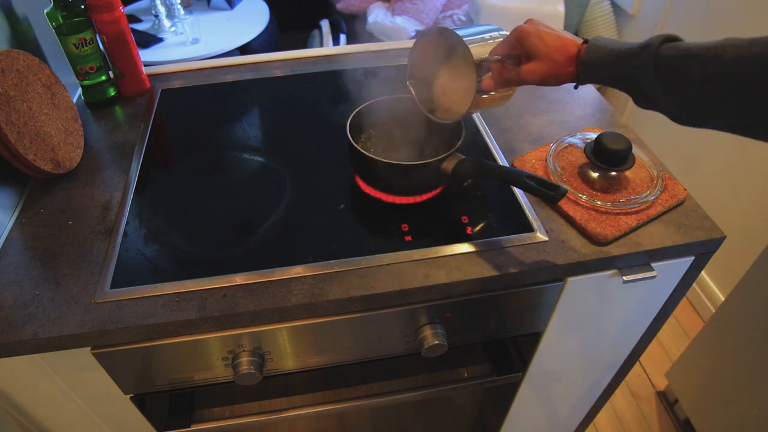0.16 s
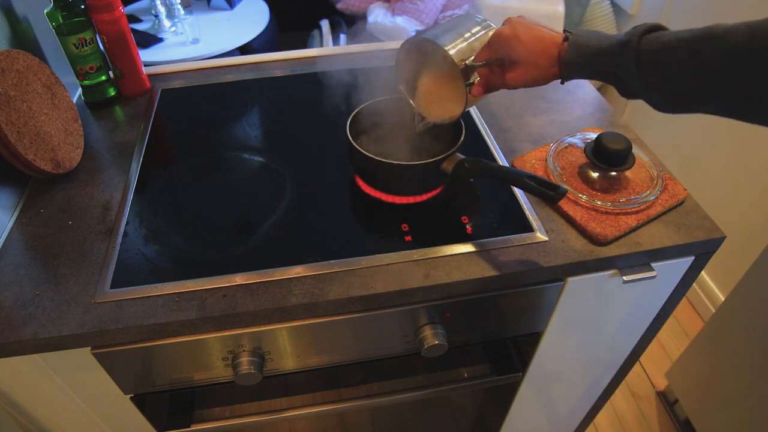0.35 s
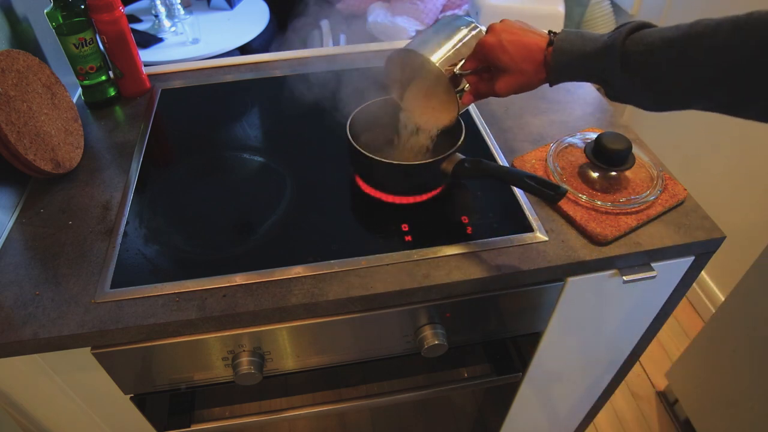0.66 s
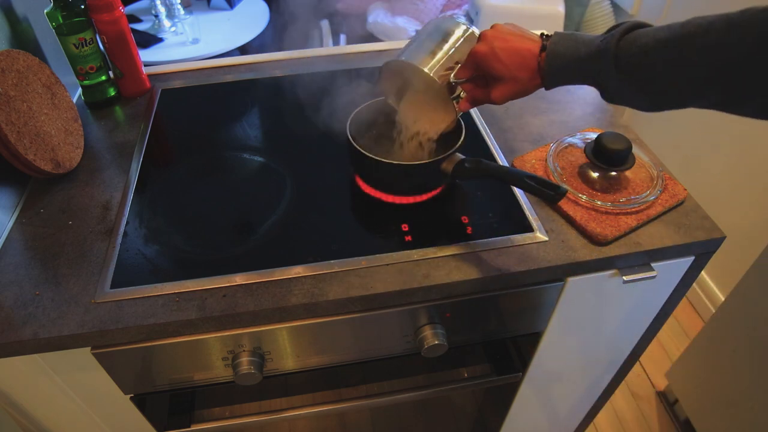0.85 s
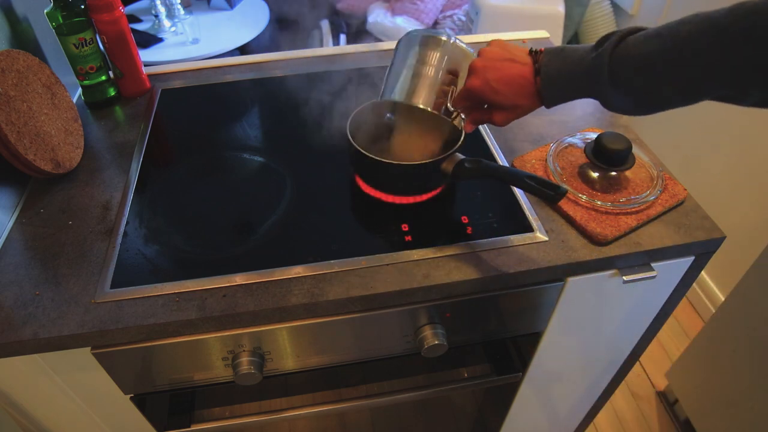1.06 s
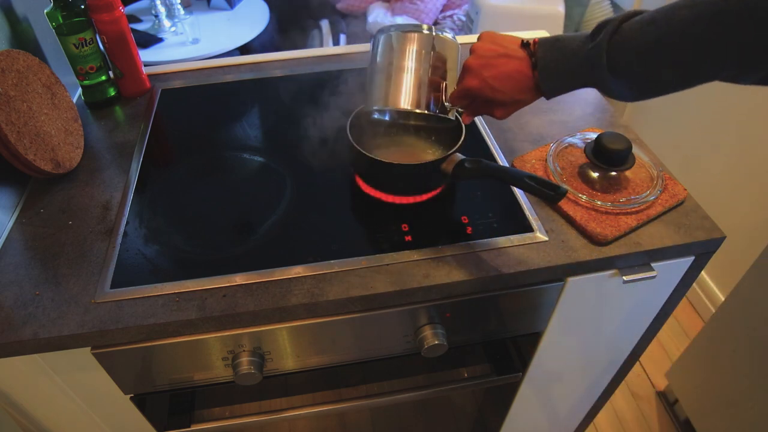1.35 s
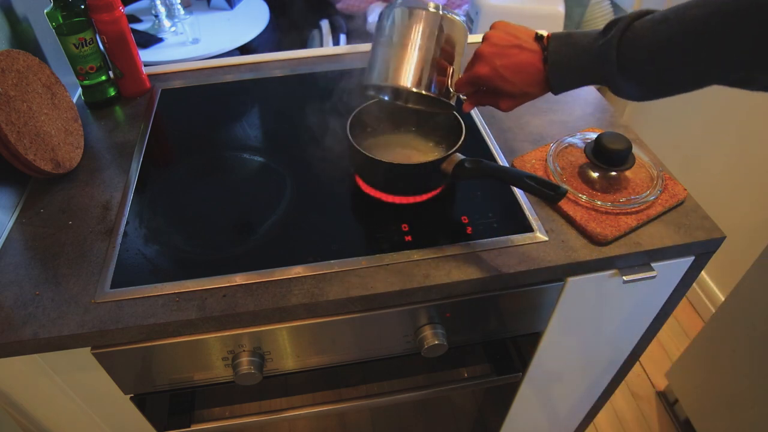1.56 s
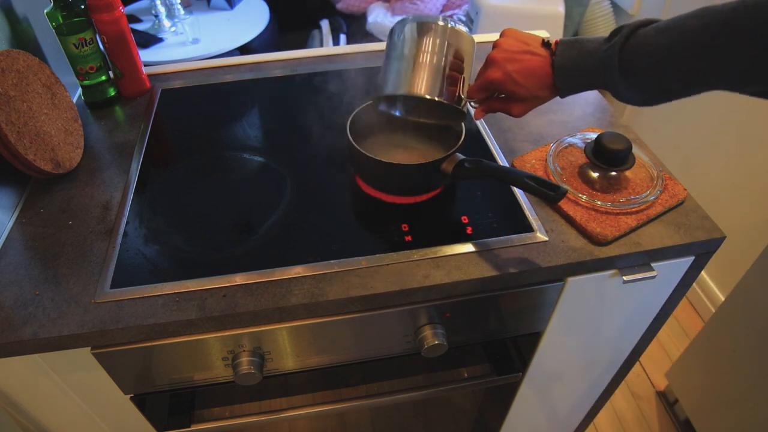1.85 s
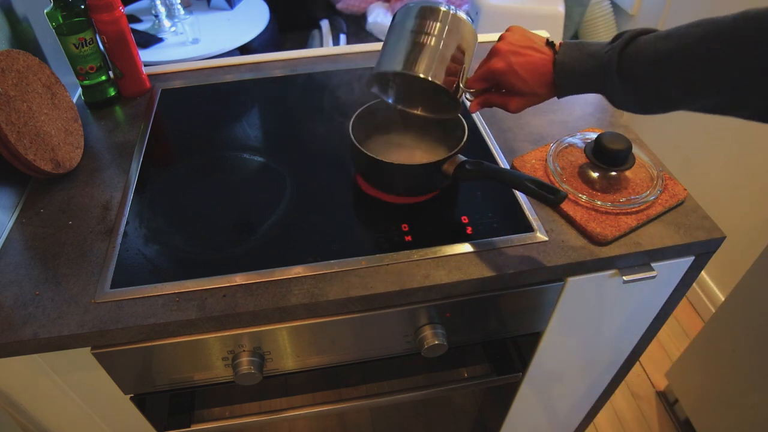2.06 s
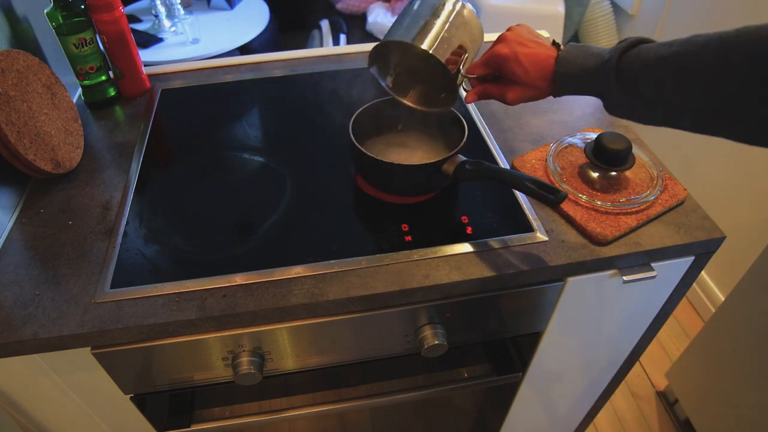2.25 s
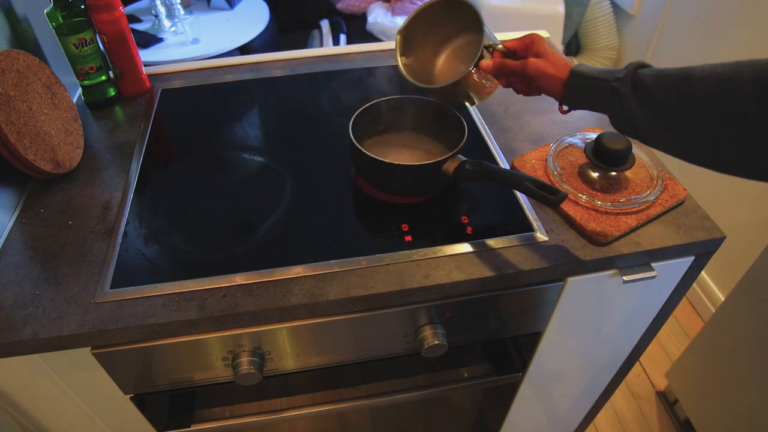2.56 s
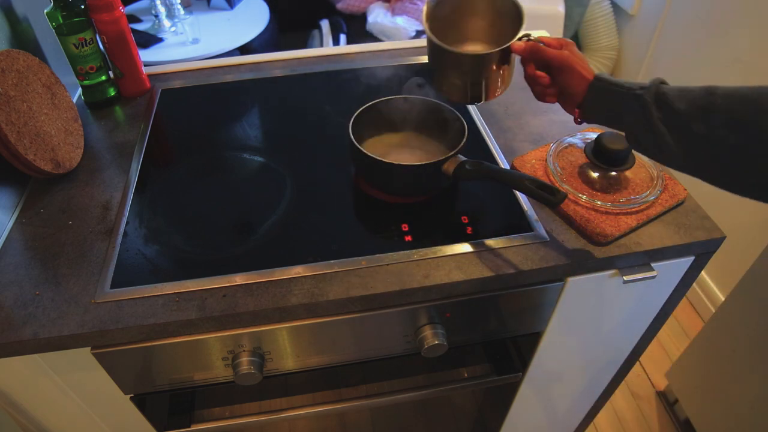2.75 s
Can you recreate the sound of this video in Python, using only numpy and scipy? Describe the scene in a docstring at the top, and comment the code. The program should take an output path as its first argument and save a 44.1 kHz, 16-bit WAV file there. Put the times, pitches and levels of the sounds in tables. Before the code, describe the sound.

Rice grains slide off steel and patter into a bubbling pot, followed by two metallic knocks

```python
"""A small kitchen: dry rice slides out of a steel jug into a pot of simmering water.
Dense random impacts, coloured separately for steel and water, make the hiss and patter; shakes add surges.
The same kind of impacts drive resonant modes for the singing jug and the bubbles.
Dull knocks fall during the pour and hard metal knocks follow, built from decaying sines and noise bands."""
import sys
import numpy as np
from scipy import signal
from scipy.fft import rfft, irfft
from scipy.io import wavfile
from scipy.ndimage import uniform_filter1d

SR = 44100
rng = np.random.default_rng(int(sys.argv[2]) if len(sys.argv) > 2 else 0)


def to_wav(sig):
    """Store sig (one row per channel, or 1-D mono) as 16-bit WAV at the path in sys.argv[1].

    Samples outside -1..1 are clipped; the rate is SR.
    """
    pcm = np.clip(np.atleast_2d(sig), -1, 1) * 32767
    pcm = np.round(pcm).astype(np.int16)
    wavfile.write(sys.argv[1], SR, pcm.T)  # frames by channels


N = 127890
TIME = np.arange(N) / SR  # scene clock [s]
AGE = np.arange(2 ** 15) / SR  # time since a knock or skitter began [s]

# quiet kitchen background: (frequency [Hz], relative density [dB per Hz])
FLOOR_COLOUR = [(25, -11), (55, -5.5), (80, 3), (130, -3), (220, 0), (400, -12), (1200, -12.5),
                (3000, -22.5), (8000, -31.5), (16000, -29)]
FLOOR_DB = -62.5

# the boil, quenched by the cold rice: (time [s], level [dB])
BOIL_LEVEL = [(0, -55.5), (.4, -57.5), (.7, -54), (1.0, -60), (1.3, -61.5), (1.5, -68.5), (2.0, -72.5),
              (2.9, -67)]
# tone shaping of the bubbles: (frequency [Hz], gain [dB])
BOIL_COLOUR = [(100, -23), (250, -5.5), (500, 7), (720, 0), (1050, 2.5), (1600, -2.5), (2500, -24),
               (6000, -46)]
BUBBLES_PER_S, BUBBLE_SPREAD_DB = 2600, 1.5

# knocks: (time [s], level [dB], contact cut-off [Hz], bass [dB], dense ring [dB], steel ring [dB],
#          share struck on the rim [0-1], extra damping from contact [dB per s])
KNOCKS = [(0.186, -12, 536, -5, 8, -40, 0, 125), (0.433, -18.5, 880, -28, 0, -32, .5, 400),
          (0.4996, -11.5, 750, 1, 1.5, -11, .5, 86), (1.1629, -5.5, 1300, -10, -2, -28, .5, 215),
          (1.6966, -34, 1080, -12, 13, 5.5, 0.6, 44), (2.0405, 2.5, 3340, -4, -2.5, -1.5, 0.37, 15),
          (2.5162, 4, 670, -2, -2, -3.5, 0.9, 8), (2.529, -9, 1980, -12.5, 1, -21, .9, 252)]
# dull body modes of the pot on the hob: (frequency [Hz], level [dB], undamped t60 [s])
POT_MODES = [(148, -20.5, 0.051), (185, -27, 0.31), (228.6, -36, 0.28), (286.5, -37.5, 0.34),
             (364, -32.5, 0.2), (433.3, -24, 0.091), (488.7, -31, 0.23), (675, -20, 0.018),
             (748, -34, 0.18), (1178, -30.5, 0.15), (1230, -20, 0.012), (1397, -33, 0.12),
             (1650, -33, 0.072), (1750, -29, 0.099), (1837, -28.5, 0.05), (1932, -26, 0.11),
             (2260, -20.5, 0.017)]
BASS_HZ = 280  # a knock's bass setting acts below about here
# steel modes: (frequency [Hz], struck on the wall [dB], struck on the rim [dB],
#               stirred by grains [dB], undamped t60 [s])
STEEL_MODES = [(2840, -60, -53, -18, .3), (3058, -58, -45, -13, .62), (3467, -62, -48, -24, .35),
               (3541, -45, -49, -9, .33), (3704, -58, -37, -22, .33), (3845, -33, -51, -18, .41),
               (3868, -40, -58, -22, .36), (4480, -33, -52, -16, .07), (4720, -58, -60, -7, .5),
               (4830, -54, -38, -4, .3), (5130, -48, -55, -16, .22), (5367, -60, -57, -8, .24),
               (5706, -64, -60, -11, .24), (6470, -45, -56, -18, .33), (6584, -47, -56, -9, .3),
               (7080, -42, -52, -15, .27), (7420, -56, -40, -20, .14), (7960, -42, -56, -21, .19),
               (8608, -55, -52, -16, .2), (9900, -54, -54, -24, .25)]
# dense modes of the dull body, spread by the room: (frequency [Hz], relative density [dB per Hz])
THUD_COLOUR = [(30, -28), (70, -1), (160, 8.5), (280, -2.5), (430, -1.5), (720, -5), (950, -6),
               (1400, -0.5), (2000, -4), (2700, -26), (6000, -73)]
# dense modes of the steel, spread by the room: (frequency [Hz], relative density [dB per Hz])
CLANK_COLOUR = [(600, 12), (1600, 5.5), (2700, -1.5), (4500, -1.5), (6000, -5.5), (7500, -3.5),
                (10000, -7.5), (16000, -14)]
THUD_DB, CLANK_DB = -26.5, -33.5  # dense rings, before each knock's own levels
# how long the dense modes last: (frequency [Hz], undamped t60 [s])
DENSE_DECAY = [(60, 0.49), (170, 0.52), (450, 0.43), (1500, 0.4), (4000, 0.44), (14000, 0.25)]
CRACK_DB, CRACK_S = -24, .0045  # noise at first contact: level in the clank, time constant [s]
# the worktop booms on after a knock: (frequency [Hz], level [dB], t60 [s])
WORKTOP_BOOM = (60, -45.5, 0.6)
BOOM_FOLLOWS = 0.36  # share of a knock's level plus bass, in dB, that the boom follows

# loose grains skittering round the jug: (time [s], level [dB], favoured mode region [Hz])
SKITTERS = [(1.332, -44, 3541), (1.36, -59, 2840), (1.36, -63, 5706), (1.535, -63, 3541),
            (1.838, -49, 4810), (1.9, -56, 3541), (2.675, -58, 6470), (2.7, -64, 3845)]
SKITTER_RISE_S, SKITTER_WIDTH_HZ = .02, 50

# how strongly sliding grains set the jug ringing: (time [s], level [dB])
SINGING_LEVEL = [(0, -66), (.6, -82), (1.15, -63.5), (1.3, -63), (1.38, -56.5), (1.45, -64.5), (1.52, -74),
                 (1.57, -78), (1.65, -94), (1.8, -62.5), (1.83, -73), (1.85, -55), (1.96, -59), (2.1, -78),
                 (2.27, -71), (2.36, -98.5), (2.9, -91)]

# rice sliding along the jug wall: (time [s], level [dB])
SLIDE_LEVEL = [(0, -44.5), (.07, -60.5), (.11, -54), (.2, -53), (.3, -53.5), (.42, -60.5), (.56, -64),
               (.9, -67), (1.1, -59), (1.25, -55.5), (1.38, -53), (1.46, -66), (1.55, -70.5), (1.62, -78.5),
               (2.3, -79), (2.9, -111)]
# rice landing in the water: (time [s], level [dB])
STREAM_LEVEL = [(0, -59), (.25, -59.5), (.5, -62.5), (.62, -56.5), (.73, -52), (.9, -55.5), (1.1, -52),
                (1.26, -52.5), (1.36, -60), (1.45, -67), (1.6, -98), (2.9, -98)]
# shakes that throw loose grains against the steel: (time [s], level [dB], decay time constant [s])
SHAKES = [(-.003, -38.5, 0.0057), (.096, -50, 0.013), (0.185, -45, 0.0072), (.366, -57, .004),
          (1.495, -61, 0.014), (1.55, -65, 0.0097), (1.649, -65, .004), (1.713, -59, 0.012),
          (1.731, -58, 0.089), (1.784, -50, 0.013), (1.835, -45, 0.021), (1.863, -53.5, 0.087),
          (1.899, -49, 0.028), (1.961, -56, 0.025), (2.255, -64, 0.021), (2.672, -61, 0.038)]
SHAKE_ATTACK_S = .004
# tone of grains on steel: (frequency [Hz], relative density [dB per Hz])
STEEL_HISS = [(1000, -6.5), (2500, -10.5), (4500, -2), (7000, 1.5), (9500, 0.5), (12500, 5), (14500, 3),
              (16000, -9)]
# tone of grains on water: (frequency [Hz], relative density [dB per Hz])
WATER_HISS = [(150, 8), (500, 7), (1000, 4.5), (1800, 4.5), (3200, 6), (5500, 1.5), (8000, -1.5),
              (15000, -15)]
STEEL_GRAINS_PER_S, WATER_GRAINS_PER_S, GRAIN_SPREAD_DB = 14000, 6000, 2.5
TICKS_PER_S, TICK_SPREAD_DB, TICK_DB = 600, 3.0, -5  # sparser ticks, level relative to the fine grains

CUTOFF_HZ = 16000


def from_db(db):
    """Decibels to gain."""
    return 10 ** (np.asarray(db) / 20)


def rms_one(x):
    """Scale to unit rms."""
    return x / np.sqrt(np.mean(x ** 2) + 1e-20)


def level(rows):
    """Gain over time from (time [s], level [dB]) rows."""
    return from_db(np.interp(TIME, *np.transpose(rows)))


def at_hz(points, hz):
    """Read a table on a log-frequency axis."""
    table_hz, values = np.transpose(points)
    return np.interp(np.log(np.maximum(hz, 1)), np.log(table_hz), values)


def colour(x, spectrum):
    """Shape a steady texture's spectrum and bring it to unit rms."""
    gain = from_db(at_hz(spectrum, np.fft.rfftfreq(len(x), 1 / SR)))
    return rms_one(irfft(rfft(x) * gain, len(x)))


def grains(per_s, spread_db):
    """Tiny impacts at random moments, of uneven size and random polarity."""
    sizes = from_db(spread_db * np.minimum(rng.exponential(1, N), 5))
    signs = rng.choice([-1, 1], N)
    hits = rng.random(N) < per_s / SR
    return sizes * signs * hits


def ring(x, hz, t60):
    """One resonant mode: each unit click starts a decaying sine of height 1."""
    radius = from_db(-60 / (t60 * SR))
    angle = 2 * np.pi * hz / SR
    # the minute offset keeps the filter from running on vanishing numbers
    return signal.lfilter([0, np.sin(angle)], [1, -2 * radius * np.cos(angle), radius ** 2], x + 1e-18)


def dying(t60):
    """Exponential decay that falls 60 dB in t60 seconds."""
    return np.exp(-np.log(1000) * AGE / t60)


def mode(hz, t60):
    """A decaying sine from time zero."""
    return np.sin(2 * np.pi * hz * AGE) * dying(t60)


def dense_ring(spectrum, weight):
    """Countless overlapping modes: noise bands, each dying at its own rate."""
    hz = np.fft.rfftfreq(len(AGE), 1 / SR)
    noise = rfft(colour(rng.standard_normal(len(AGE)), spectrum)) * weight(hz)
    edges = np.geomspace(20, 20000, 15)
    out = np.zeros(len(AGE))
    for low, high in zip(edges, edges[1:]):
        band = irfft(noise * ((hz >= low) & (hz < high)))
        out += band * dying(at_hz(DENSE_DECAY, np.sqrt(low * high)))
    return out


def place(sounds):
    """Mix (time [s], sound) pairs onto the timeline."""
    out = np.zeros(N + len(AGE))
    for start_s, sound in sounds:
        start = int(start_s * SR)
        out[start:start + len(AGE)] += sound
    return out[:N]


def kitchen_floor():
    """Steady coloured noise for the quiet kitchen."""
    return from_db(FLOOR_DB) * colour(rng.standard_normal(N), FLOOR_COLOUR)


def simmer():
    """Small bubbles: random clicks excite short resonances, each ringing for a few cycles."""
    pitches = np.geomspace(250, 2500, 18)
    bubbles = np.zeros(N)
    for hz in pitches:
        clicks = grains(BUBBLES_PER_S / len(pitches), BUBBLE_SPREAD_DB)
        bubbles += rms_one(ring(clicks, hz, 9 / hz)) * np.sqrt(hz)
    return level(BOIL_LEVEL) * colour(bubbles, BOIL_COLOUR)


def thud(contact_hz, bass_db, dense_db):
    """The dull body of a knock; a softer contact weakens the higher modes."""
    def weight(hz):
        bass = from_db(bass_db / (1 + (hz / BASS_HZ) ** 4))
        return bass / np.sqrt(1 + (hz / contact_hz) ** 4.27)

    modes = np.zeros(len(AGE))
    for k, (hz, db, t60) in enumerate(POT_MODES):
        modes += (-1) ** k * from_db(db) * weight(hz) * mode(hz, t60)  # alternating polarity
    return modes + from_db(THUD_DB + dense_db) * dense_ring(THUD_COLOUR, weight)


def clank(rim):
    """The bright part of a knock: a crack, then steel modes whose mix depends on the spot struck."""
    modes = np.zeros(len(AGE))
    for k, (hz, wall_db, rim_db, _, t60) in enumerate(STEEL_MODES):
        struck_db = wall_db + rim * (rim_db - wall_db)
        modes += (-1) ** k * from_db(struck_db) * mode(hz, t60)
    crack = colour(rng.standard_normal(len(AGE)), CLANK_COLOUR) * np.exp(-AGE / CRACK_S)
    dense = dense_ring(CLANK_COLOUR, np.ones_like)
    return modes + from_db(CRACK_DB) * crack + from_db(CLANK_DB) * dense


def knocks():
    """Thuds with more or less steel over a faint boom; a lingering contact cuts the ring short."""
    boom_hz, boom_db, boom_t60 = WORKTOP_BOOM
    sounds = []
    for start_s, db, contact_hz, bass_db, dense_db, steel_db, rim, damping in KNOCKS:
        blow = thud(contact_hz, bass_db, dense_db) + from_db(steel_db) * clank(rim)
        damped_blow = from_db(db - damping * AGE) * blow
        boom_gain = from_db(boom_db + BOOM_FOLLOWS * (db + bass_db))
        sounds.append((start_s, damped_blow + boom_gain * mode(boom_hz, boom_t60)))
    return place(sounds)


def skitters():
    """A run of tiny touches, heard as a smooth swell of the nearest steel modes, which then ring out."""
    swell = 1 - np.exp(-AGE / SKITTER_RISE_S)
    sounds = []
    for start_s, db, favoured_hz in SKITTERS:
        modes = np.zeros(len(AGE))
        for hz, _, _, _, t60 in STEEL_MODES:
            closeness = 1 / (1 + ((hz - favoured_hz) / SKITTER_WIDTH_HZ) ** 2)
            modes += closeness * mode(hz, t60)
        sounds.append((start_s, from_db(db) * swell * modes))
    return place(sounds)


def singing_jug():
    """Grain impacts keep the steel modes ringing, each evened out before the mix is ridden in level."""
    impacts = grains(STEEL_GRAINS_PER_S, GRAIN_SPREAD_DB)
    out = np.zeros(N)
    for hz, _, _, stirred_db, t60 in STEEL_MODES:
        tone = ring(impacts, hz, t60)
        running_rms = np.sqrt(uniform_filter1d(tone ** 2, size=4000) + 1e-12)
        out += from_db(stirred_db) * tone / running_rms
    return level(SINGING_LEVEL) * rms_one(out)


def rice_on_steel():
    """Grains hiss and tick along the steel; slide and shakes add up as power."""
    power = level(SLIDE_LEVEL) ** 2
    for start_s, db, decay_s in SHAKES:
        age = np.maximum(TIME - start_s, 0)
        attack = np.minimum(age / SHAKE_ATTACK_S, 1)
        decay = np.exp(-np.maximum(age - SHAKE_ATTACK_S, 0) / decay_s)
        power = power + (from_db(db) * attack * decay) ** 2
    fine = rms_one(grains(STEEL_GRAINS_PER_S, GRAIN_SPREAD_DB))
    ticks = rms_one(grains(TICKS_PER_S, TICK_SPREAD_DB))
    return np.sqrt(power) * colour(fine + from_db(TICK_DB) * ticks, STEEL_HISS)


def rice_in_water():
    """Grains patter into the water as dense, softly coloured impacts."""
    patter = colour(grains(WATER_GRAINS_PER_S, GRAIN_SPREAD_DB), WATER_HISS)
    return level(STREAM_LEVEL) * patter


def scene():
    """Kitchen, boil and knocks under the jug and the pouring rice."""
    background = kitchen_floor() + simmer() + knocks()
    jug = skitters() + singing_jug()
    rice = rice_on_steel() + rice_in_water()
    return (background + jug + rice)[None]


def record(dry):
    """Cut the top steeply with an elliptic low-pass."""
    low_pass = signal.ellip(10, .1, 80, CUTOFF_HZ, fs=SR, output="sos")
    return signal.sosfilt(low_pass, dry)


dry = scene()
out = record(dry)
to_wav(out)
```